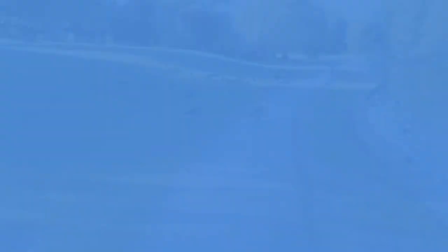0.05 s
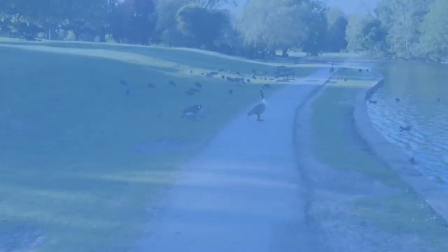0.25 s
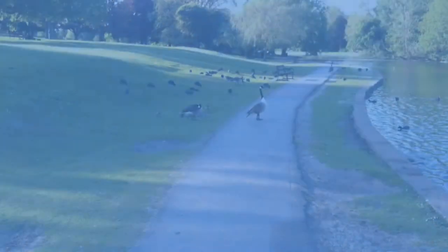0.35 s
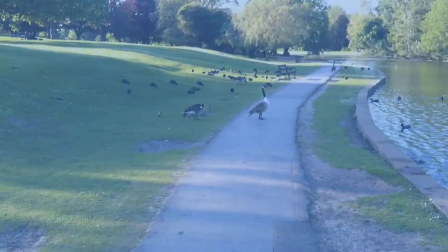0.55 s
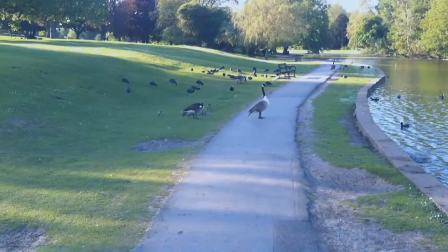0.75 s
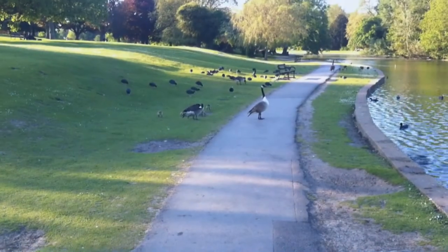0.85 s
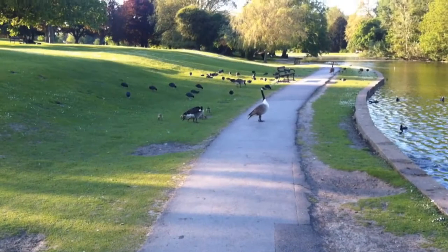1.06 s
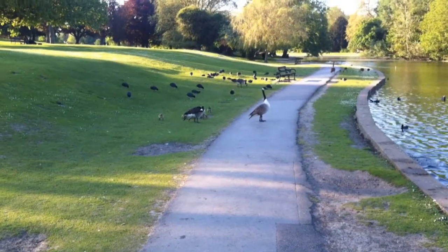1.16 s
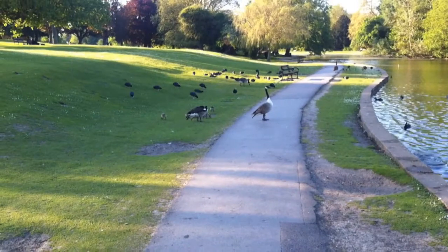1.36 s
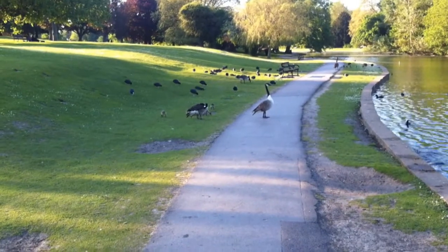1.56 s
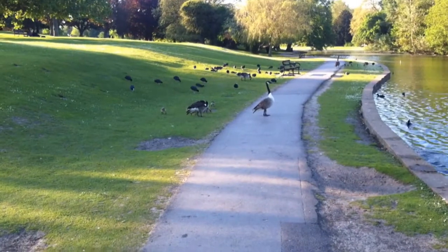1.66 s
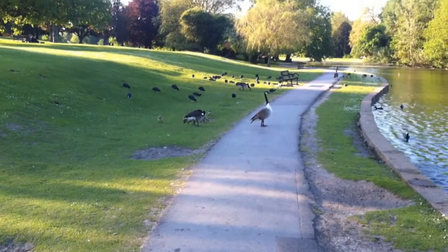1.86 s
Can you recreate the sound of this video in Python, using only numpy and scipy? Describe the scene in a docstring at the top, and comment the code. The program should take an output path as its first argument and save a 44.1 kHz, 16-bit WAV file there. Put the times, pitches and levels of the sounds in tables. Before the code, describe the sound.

A goose gives three short, harsh honks outdoors, with light wind and soft microphone bumps.

```python
"""A goose on a lakeside path in a park, heard in the open air.
After a moment of silence come the far hush of the park, light wind and soft handling bumps on the
microphone, then one small knock and a low, sinking hum. The goose gives three short, harsh honks,
each a train of sharp pulses through the throat that flutters in pitch and strength, then clears and
sinks, with a dull echo off the bank. Around the last honk a faint rustle rises in the distance."""
import sys
import numpy as np
from scipy import signal
from scipy.fft import rfft, irfft
from scipy.io import wavfile
from scipy.ndimage import uniform_filter1d

SR = 44100
rng = np.random.default_rng(int(sys.argv[2]) if len(sys.argv) > 2 else 0)


def transcribe(signal):
    """Save signal, clipped to [-1, 1], as a 16-bit WAV file at the path in sys.argv[1]."""
    frames = np.atleast_2d(signal).T
    limited = np.clip(frames, -1, 1)
    pcm = np.round(limited * 32767).astype(np.int16)
    wavfile.write(sys.argv[1], SR, pcm)


N = 83790
T = np.arange(N) / SR

# Spectrum of the far park. Each row: frequency in Hz, relative level in dB.
HUSH_COLOUR = [(300, -2.5), (480, -7), (650, -3.5), (1020, -5.5), (1350, -9.5), (1700, -11.5), (2400, -17),
               (3600, -20.5), (5000, -22.5), (7000, -25.5), (10000, -28), (15500, -28.5)]
# Swell of the distant rustle. Each row: time in seconds, level in dB.
RUSTLE_LEVELS = [(1.35, -87), (1.5, -68), (1.58, -75.5), (1.63, -75), (1.69, -70.5), (1.78, -73),
                 (1.9, -76)]
# Course of the low hum. Each row: time in seconds, pitch in Hz, level in dB.
HUM_PATH = [(0.271, 170, -79), (0.289, 168.7, -48.5), (.38, 165.8, -56), (0.418, 161.3, -48),
            (0.479, 134.6, -54), (0.541, 121, -52), (.6, 104, -71), (.66, 99.5, -86)]
# Gusts on the microphone. Each row: time in seconds, level in dB.
GUSTS = [(.17, -59.5), (.21, -50.5), (.27, -46.5), (.31, -58.5), (.38, -57.5), (.42, -58), (.48, -51.5),
         (.53, -58), (.6, -49.5), (.66, -59), (.8, -61), (.9, -63), (.98, -62.5), (1.04, -59.5),
         (1.12, -61.5), (1.27, -58), (1.45, -60.5), (1.6, -58), (1.79, -60.5), (1.9, -54)]
# Spectrum of the buffeting. Each row: frequency in Hz, relative level in dB.
GUST_COLOUR = [(18, -28), (30, -29), (111, -1), (156, 0), (190, -5.5), (301, -10.5), (500, -14), (650, -44),
               (1100, -120)]
# Handling bumps. Each row: centre in seconds, peak level in dB, pitch in Hz, half length in seconds.
HANDLING_BUMPS = [(.215, -40, 210, 0.0049), (.2295, -43, 220, .003), (.249, -33, 195, 0.0052),
                  (.2755, -36, 181.5, .009), (.599, -44.5, 230, 0.0051), (.615, -37.5, 177, 0.0047),
                  (1.037, -56.5, 150, 0.018), (1.253, -43, 161, 0.0052), (1.363, -51.5, 165, 0.0089),
                  (1.6, -48, 128, 0.011)]
# Resonances of the goose's throat. Each row: frequency in Hz, gain in dB.
THROAT_COLOUR = [(500, -28), (880, -13.5), (1150, -17), (1400, -17), (1850, -8), (2300, -7.5), (2700, -7.5),
                 (3200, -5.5), (3600, -4.5), (4400, -8), (5300, -12), (6200, -16), (7050, -8.5),
                 (7900, -18), (9000, -19), (10700, -38), (12000, -29), (15500, -42)]
# The calls. Each row: start in seconds, level and tail level in dB, attack, harsh part and length in
# seconds, pitch, tail pitch and flutter rate in Hz, flutter as a share of pitch, bill resonance in Hz.
GOOSE_HONKS = [(0.4315, -36, -44, 0.025, .040, 0.094, 1045, 931.5, 133.4, 0.095, 3280),
               (0.913, -48.5, -50.5, 0.011, .029, 0.07, 899.4, 856, 119, 0.076, 2830),
               (1.4475, -39, -46.5, 0.014, 0.038, 0.087, 1003, 910, 130.7, 0.099, 3340)]

START_S, CUTOFF_HZ = .16, 15800
KNOCK_S, KNOCK_RING_HZ, KNOCK_T60_S = .2666, 328, 0.051
ECHO_S, ECHO_DB, ECHO_CUT_HZ = 0.078, -24.5, 1540
FAR_DB, FAR_RISE_S, FAR_T60_S, FAR_CUT_HZ = -34, 0.24, 1.28, 3100
HONK_SPAN_S, ATTACK_DB, RELEASE_S = .15, 11, 0.024
FLUTTER_DB, FLUTTER_LEAD_S = 3.5, 0.00064   # strength swings just ahead of pitch
HARSH_JITTER, BASE_JITTER, SHIMMER_DB, RASP_DB = 0.014, 0.014, 1.5, -18
CLEARING_S, SAG_HZ_PER_S, TAIL_DB_PER_S = 0.0062, 2200, 245   # the tail clears, sinks and fades
TAIL_FLUTTER = 0.047   # share of the flutter that lingers in the tail
BILL_DB, BILL_TAIL_DB, BILL_WIDTH_HZ, BILL_TAIL_HZ = 6.5, -4, 890, 2400
TAIL_DULL_DB, FADE_DB_PER_OCTAVE_S = 3.5, 69   # treble lost per octave as effort falls and time passes
LOUD_DB, SOFT_DULL_SHARE = -43.5, 0.14   # softer honks are duller: dB per octave for each dB below this


def from_db(db):
    """Decibels to gain."""
    return 10 ** (np.asarray(db) / 20)


def rms_one(x):
    """Scale to rms 1."""
    return x / np.sqrt(np.mean(x ** 2) + 1e-20)


def cut(x, hz, kind="low", order=2):
    """Butterworth low- or high-pass."""
    return signal.sosfilt(signal.butter(order, min(hz, SR * .45), kind, fs=SR, output="sos"), x + 1e-18)


def colour(x, points):
    """Causal (minimum-phase) filter that follows a table of (Hz, dB)."""
    hz, db = np.transpose(points)
    size = 4096
    grid = np.maximum(np.arange(size // 2 + 1) * SR / size, 1)
    cepstrum = irfft(np.log(from_db(np.interp(np.log(grid), np.log(hz), db))))
    cepstrum[1:size // 2] *= 2
    cepstrum[size // 2 + 1:] = 0
    return signal.fftconvolve(x, irfft(np.exp(rfft(cepstrum))))[:len(x)]


def wobble(hz, size=N):
    """Random motion up to about a given rate, at rms 1."""
    return rms_one(cut(rng.standard_normal(size), hz))


def evened(x, span_s):
    """Hold the short-term rms at 1."""
    size = max(int(span_s * SR), 2)
    return x / np.sqrt(np.abs(uniform_filter1d(uniform_filter1d(x ** 2, size), size)) + 1e-12)


def hush():
    """Steady noise from the far reaches of the park."""
    noise = colour(rng.standard_normal(N), HUSH_COLOUR)
    return from_db(-62.5) * rms_one(cut(noise, 285, "high"))


def rustle():
    """A faint, distant hiss that swells around the last honk."""
    hiss = cut(cut(rng.standard_normal(N), 2300, "high"), 5050)
    return rms_one(hiss) * from_db(np.interp(T, *np.transpose(RUSTLE_LEVELS)) + 1.1 * wobble(44))


def hum():
    """A faint low tone that wavers and sinks after the knock."""
    times, hz, db = np.transpose(HUM_PATH)
    wavering_hz = np.interp(T, times, hz) + 14 * wobble(40)
    wavering_db = np.interp(T, times, db) + 4 * wobble(34)
    phase = 2 * np.pi * np.cumsum(wavering_hz) / SR
    return from_db(wavering_db) * np.sin(phase) * (T > times[0])


def wind():
    """Light gusts buffet the microphone with a low rumble."""
    rumble = cut(cut(colour(rng.standard_normal(N), GUST_COLOUR), 450), 47.4, "high")
    return evened(rumble, span_s=0.042) * from_db(np.interp(T, *np.transpose(GUSTS)))


def handling():
    """Soft bumps from handling the microphone, each a few cycles of a low tone."""
    return sum(from_db(db) * np.exp(-((T - at_s) / half_s) ** 2) * np.cos(2 * np.pi * hz * (T - at_s))
               for at_s, db, hz, half_s in HANDLING_BUMPS)


def knock():
    """A dull tick right on the microphone, with a short low ring."""
    impulse = from_db(1) * (np.arange(N) == int(KNOCK_S * SR))
    tick = cut(cut(impulse, 250, order=1), 150, "high")
    t = np.maximum(T - KNOCK_S, 0)
    ring = from_db(-37.5 - 60 * t / KNOCK_T60_S) * np.sin(2 * np.pi * KNOCK_RING_HZ * t)
    return tick + ring


def park_echoes(call):
    """The call comes back once, dull, from the bank, then as a faint scatter from far trees."""
    echo = np.interp(T - ECHO_S, T, cut(call, ECHO_CUT_HZ), left=0)
    build_up = np.minimum(T / FAR_RISE_S, 1) ** 2
    scatter = cut(rng.standard_normal(N), FAR_CUT_HZ) * from_db(-60 * T / FAR_T60_S) * build_up
    far = signal.fftconvolve(call, scatter / np.linalg.norm(scatter))[:N]
    return from_db(ECHO_DB) * echo + from_db(FAR_DB) * far


def honk(start_s, level_db, tail_db, attack_s, harsh_s, length_s,
         pitch_hz, tail_hz, flutter_hz, depth, bill_hz):
    """Pulses of the syrinx, fluttering while the effort is high, ring in throat and bill."""
    t = T[T < HONK_SPAN_S]
    effort = .5 - .5 * np.tanh((t - harsh_s) / CLEARING_S)   # 1 in the harsh part, 0 in the tail
    tail_s = np.maximum(t - harsh_s, 0)

    swing = np.cos(2 * np.pi * flutter_hz * (t - FLUTTER_LEAD_S))
    flutter = depth * np.maximum(effort, TAIL_FLUTTER) * swing
    jitter = (BASE_JITTER + HARSH_JITTER * effort) * wobble(400, size=len(t))
    glide_hz = tail_hz + (pitch_hz - tail_hz) * effort - SAG_HZ_PER_S * tail_s
    hz = glide_hz * (1 + flutter + jitter)
    phase = 2 * np.pi * np.cumsum(hz) / SR
    harmonic = np.arange(1, CUTOFF_HZ // tail_hz + 1)[:, None]

    # The bill resonance sinks and weakens as the honk ends.
    centre_hz = BILL_TAIL_HZ + (bill_hz - BILL_TAIL_HZ) * effort
    bill_gain = from_db(BILL_TAIL_DB + (BILL_DB - BILL_TAIL_DB) * effort)
    bill = 1 + bill_gain / (1 + 2j * (harmonic * hz - centre_hz) / BILL_WIDTH_HZ)
    tail_dull_db = TAIL_DULL_DB * (1 - effort) + FADE_DB_PER_OCTAVE_S * tail_s
    soft_dull_db = SOFT_DULL_SHARE * (LOUD_DB - level_db)
    tilt = from_db(-(tail_dull_db + soft_dull_db) * np.log2(harmonic))
    pulses = np.sum(tilt * np.real(bill * np.exp(1j * harmonic * phase)), axis=0)
    air_puffs = 2 * (1 + np.cos(phase)) * rng.standard_normal(len(t))
    voice = evened(colour(pulses + from_db(RASP_DB) * air_puffs, THROAT_COLOUR), span_s=0.0084)

    db = tail_db + (level_db - tail_db) * effort - TAIL_DB_PER_S * tail_s
    db -= ATTACK_DB * np.maximum(1 - t / attack_s, 0)
    db += FLUTTER_DB * effort * np.cos(2 * np.pi * flutter_hz * t)
    db += SHIMMER_DB * wobble(580, size=len(t))
    gate = np.minimum(t / 0.0025, 1) * np.clip((length_s - t) / RELEASE_S, 0, 1)
    return np.pad(-voice * from_db(db) * gate, (int(start_s * SR), N))[:N]


def scene():
    """The goose on the path, the park behind it and the noises at the microphone, in mono."""
    goose = sum(honk(*row) for row in GOOSE_HONKS)
    return (goose + park_echoes(goose) + wind() + handling() + hush() + rustle() + knock() + hum())[None]


def record(dry):
    """The microphone opens after a short silence; deep bass and the very top are cut."""
    opened = cut(dry * np.clip((T - START_S) / .002, 0, 1), 34, "high")
    return signal.sosfilt(signal.ellip(12, .1, 70, CUTOFF_HZ, fs=SR, output="sos"), opened)


dry = scene()
out = record(dry)
transcribe(out)
```